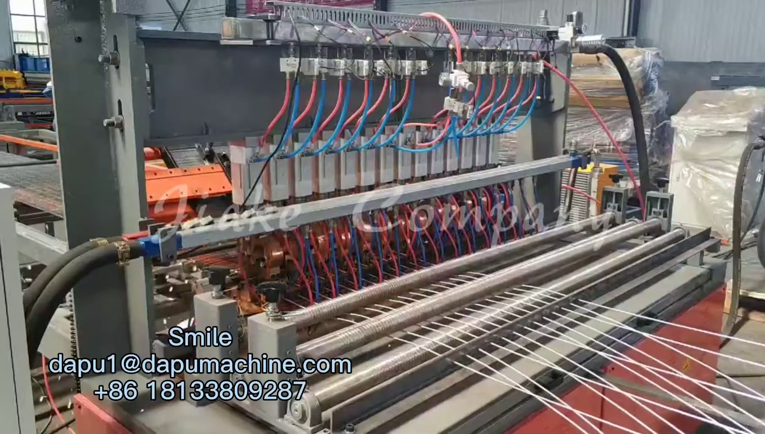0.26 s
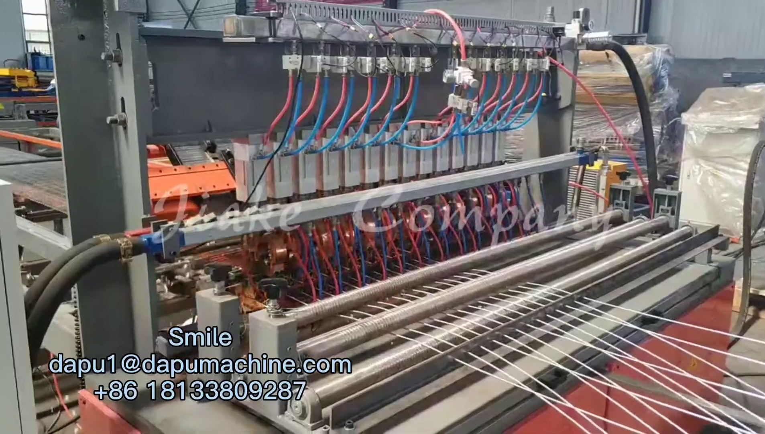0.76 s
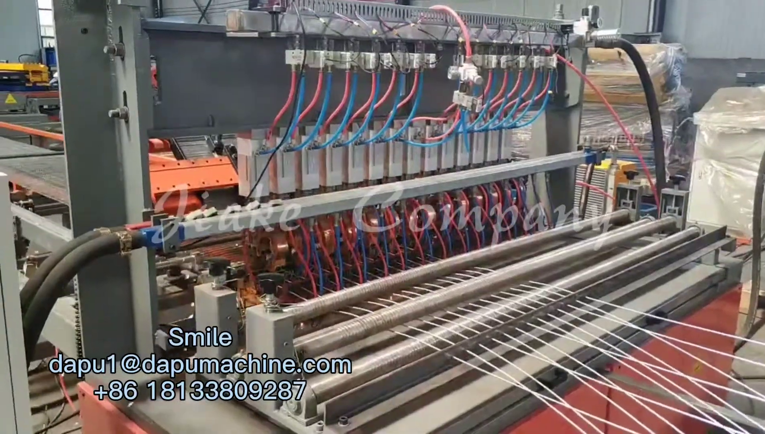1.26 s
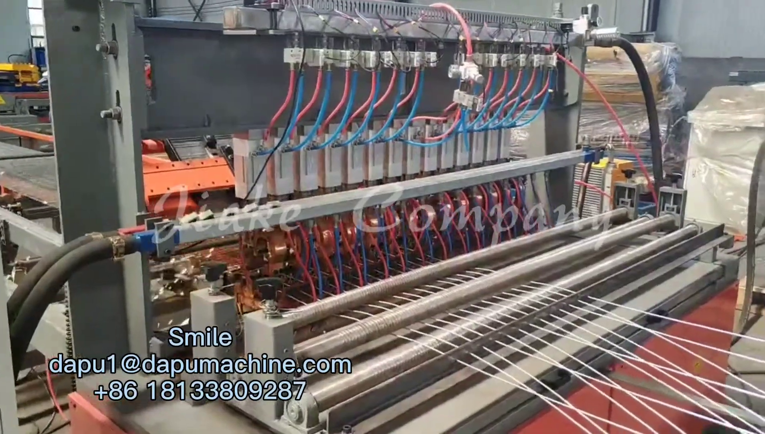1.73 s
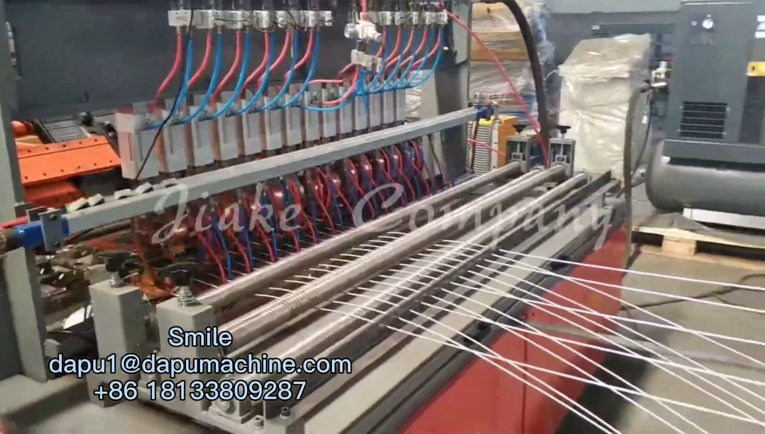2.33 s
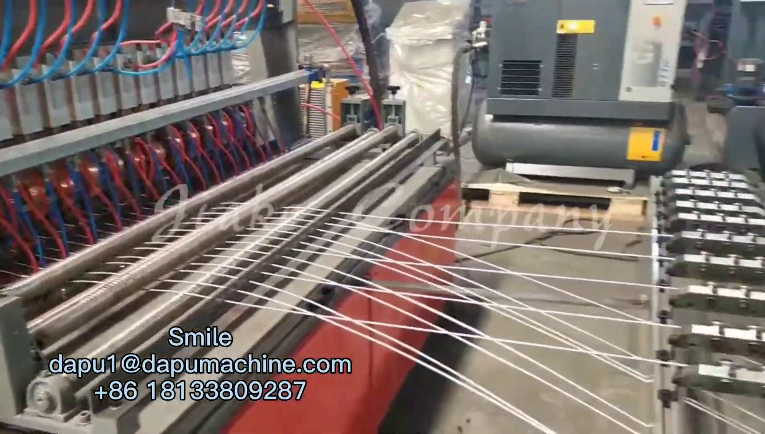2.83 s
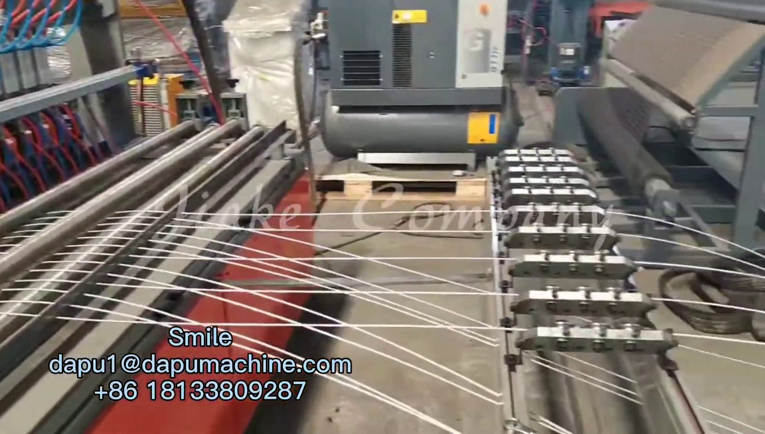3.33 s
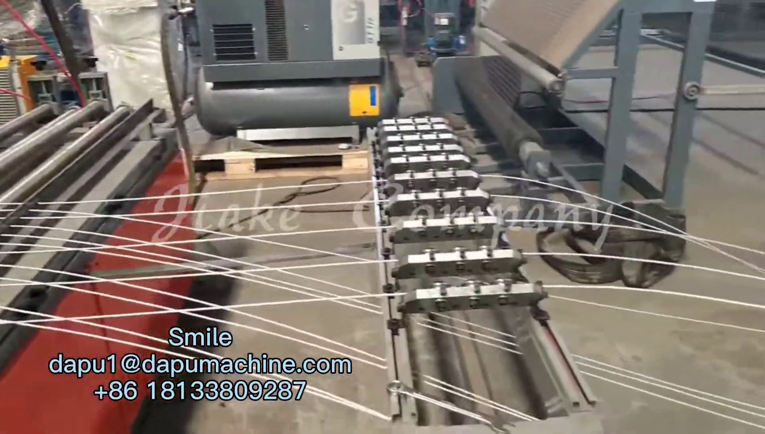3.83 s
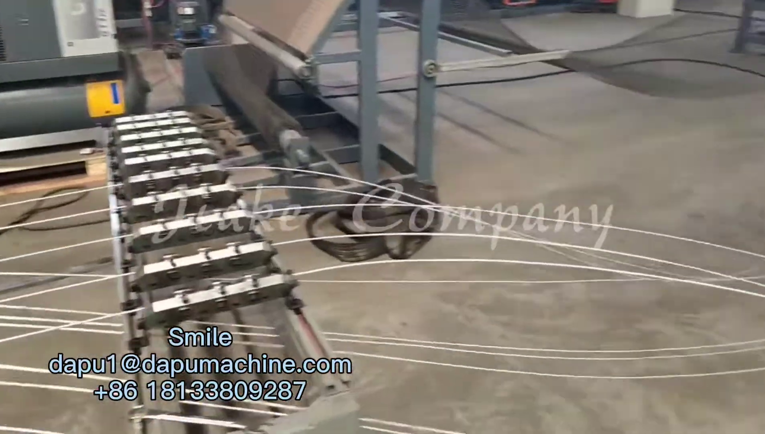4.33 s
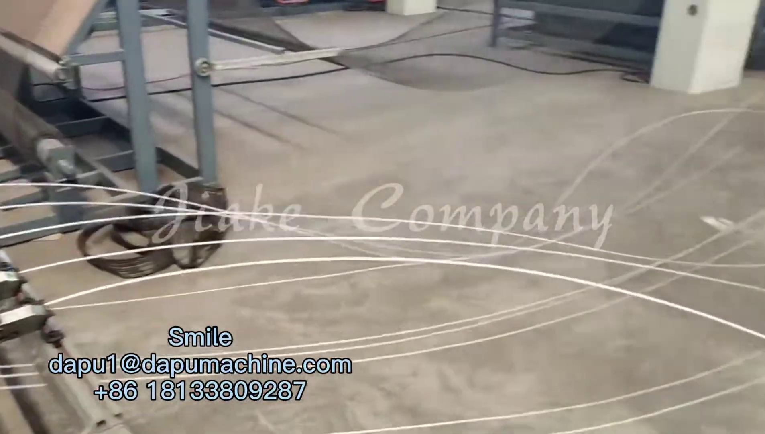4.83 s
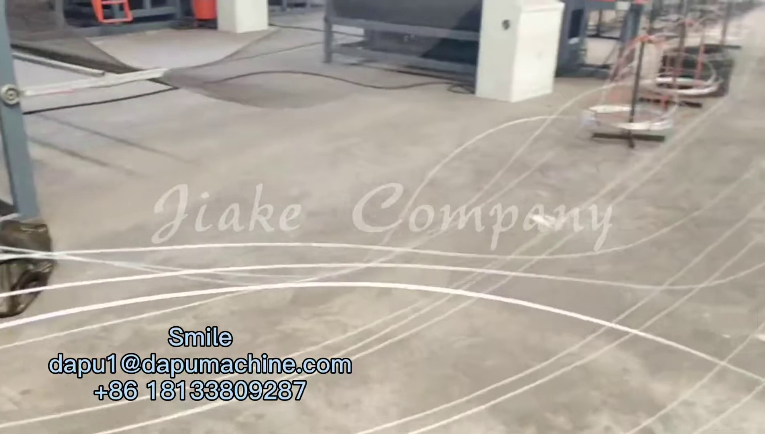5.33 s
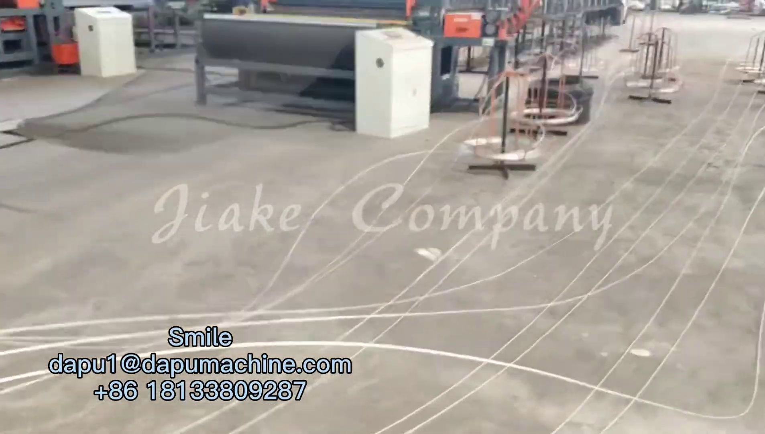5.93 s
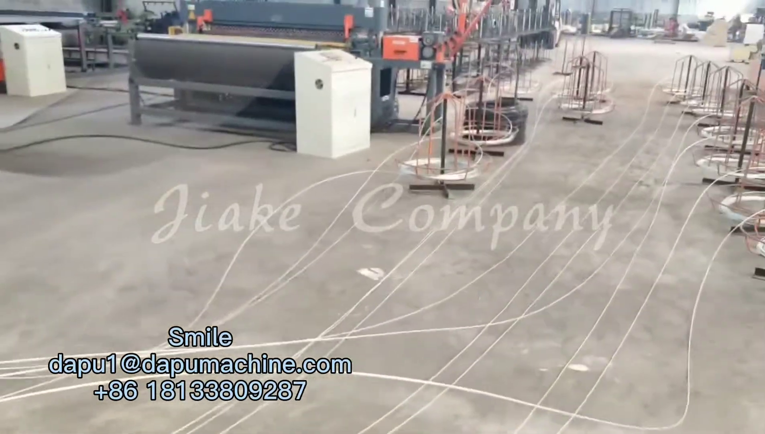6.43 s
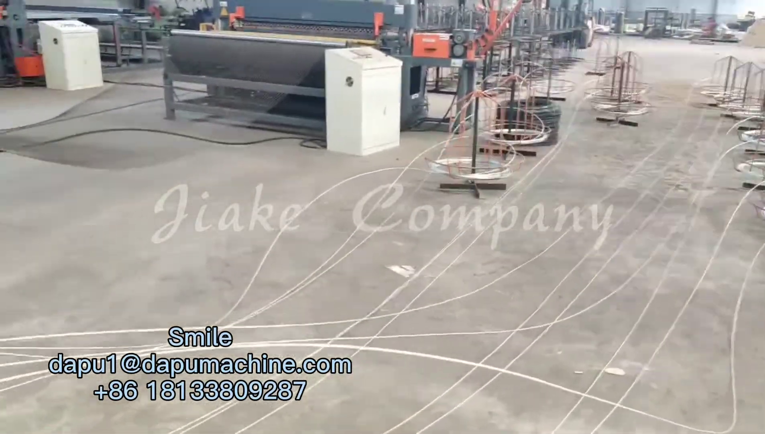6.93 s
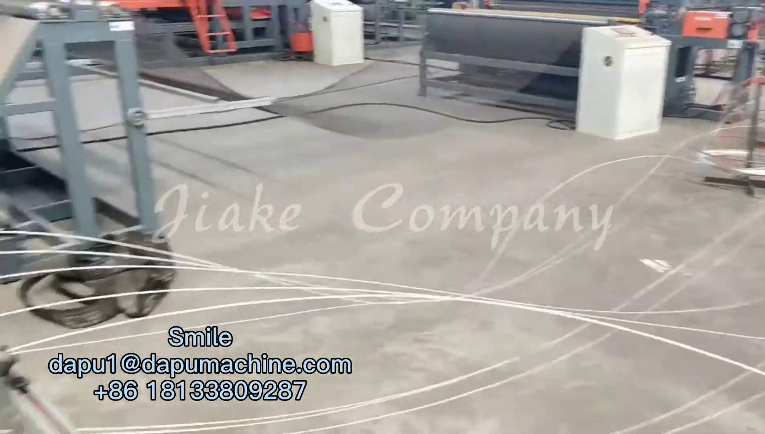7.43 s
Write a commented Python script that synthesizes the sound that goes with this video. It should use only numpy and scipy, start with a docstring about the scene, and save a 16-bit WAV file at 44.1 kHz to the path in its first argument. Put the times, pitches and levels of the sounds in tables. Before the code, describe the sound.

The sound opens quickly from a reduced level into dense factory din with faint wavering motor hum and constant fine wire chatter. From about 0.3 seconds a welding beam lands every half second. Before each blow wires scrape, feed air puffs twice and a bright valve ticks; then comes a low thump, metallic clack and ringing, quick bounces and frame rattle, a carriage jolt, and, about 0.27 seconds after landing, a soft lift thud and strong air hiss. Sharp weld spits crack near 0.9, 1.4, 2.9, 3.4, 4.4, 5.9, 6.4 and 6.9 seconds. Between 0.8 and 4.5 the hiss grows and rattle weakens. One stroke arrives slightly early around 5.5. From 4.5 to 7 the clatter becomes duller as the microphones turn away, then brightens toward the end near 7.6. Loud bursts briefly duck everything.

```python
"""A pneumatic wire-mesh welder runs at two strokes a second amid the filtered-noise din of a factory hall.
The gain opens at the start; each stroke then drags chattering wires (random contacts); a valve ticks brightly.
The electrode beam lands with a pressure swing, ringing damped modes; it bounces and some welds spit noise.
The carriage jolts back, the beam lifts, and the cylinders vent a hiss of noise shaped by falling pressure.
As the stereo microphones near the valves, hiss gains on rattle; the gain ducks after loud bursts."""
import sys
import numpy as np
from scipy import signal
from scipy.fft import rfft, irfft, next_fast_len
from scipy.io import wavfile
from scipy.ndimage import uniform_filter1d, map_coordinates

SR = 44100
rng = np.random.default_rng(int(sys.argv[2]) if len(sys.argv) > 2 else 0)


def inscribe(sig):
    """Save sig as 16-bit PCM at rate SR to the path in sys.argv[1].

    A 1-D sig is mono; a 2-D sig holds one channel per row.
    Samples are clipped to [-1, 1] before scaling.
    """
    pcm = np.round(np.clip(np.atleast_2d(sig).T, -1, 1) * 32767)
    wavfile.write(sys.argv[1], SR, pcm.astype(np.int16))


N = 338247

# damped modes of the machine frame, relative levels: frequency_hz, level_db, t60_s
FRAME_MODES = [(113.4, -4.5, 0.32), (159.2, -4, 0.22), (210.2, -4, 0.18), (258, -3.5, 0.1),
               (351.5, -6, 0.13), (419, -6.5, 0.086), (466, -1.5, 0.094), (560, -7, 0.1),
               (596, -1.5, 0.077), (734, -7, 0.059)]
# spectrum of escaping air, relative levels: frequency_hz, level_db
AIR_SPECTRUM = [(300, -26), (1500, -14), (2700, -6.5), (3700, -8.5), (5500, -3.5), (7000, 0), (8600, .5),
                (10000, -2), (11500, -8), (14200, -9)]
# stereo width, side minus mid: frequency_hz, side_minus_mid_db
STEREO_WIDTH = [(100, -23), (300, -12.5), (700, -5.5), (1400, -3.5), (4000, 0), (14000, -2)]

# the beam first lands at FIRST_S, then once every CYCLE_S
FIRST_S, CYCLE_S = 0.3136, 0.49811
# one weld is cut short, so each later step of the cycle comes early
SHORT_AT_S, SHORT_BY_S = 5.45, 0.021
# steps of the cycle: leads before the landing of the beam, the others after it
FEED_LEAD_S, TICK_LEAD_S, CLAMP_S, RETURN_S, LIFT_S = 0.117, 0.057, 0.0278, 0.13, 0.271
# standard deviation of a step's level from cycle to cycle
VARY_DB = 0.7


def amp(db):
    """A level in decibels as an amplitude ratio."""
    return 10 ** (np.asarray(db) / 20)


def unit(x):
    """Normalization to an rms value of 1."""
    return x / np.sqrt(np.mean(x ** 2) + 1e-20)


def along(points, hz):
    """Interpolation of (frequency, value) points on a logarithmic frequency axis."""
    f, v = np.transpose(points)
    return np.interp(np.log(hz + 1), np.log(f + 1), v)


def clock():
    """Time of every sample in seconds."""
    return np.arange(N) / SR


def wobble(rate):
    """Slow random modulation: a smooth curve through rate random knots a second."""
    return map_coordinates(rng.standard_normal(int(N * rate / SR) + 4), [clock() * rate])


def filtered(x, response):
    """Linear filtering: the spectrum times a complex response of frequency."""
    m = next_fast_len(N + SR // 2)
    return irfft(rfft(x, m) * response(np.fft.rfftfreq(m, 1 / SR)), m)[..., :N]


def spread(pair):
    """Interaural coherence: two unrelated signals become a pair alike in the bass, diffuse in the treble."""
    mid = pair[0]
    side = filtered(pair[1], lambda hz: amp(along(STEREO_WIDTH, hz)))
    return np.array([mid + side, mid - side])


def rush(spectrum, patchy_db):
    """Turbulence as shaped stereo noise of rms 1, with time-frequency patches of random gain."""
    z = signal.stft(rng.standard_normal((2, N), dtype=np.float32), nperseg=512)[2]
    field = uniform_filter1d(rng.standard_normal(z.shape[1:]), 4, 0)
    field = uniform_filter1d(field, 8, 1)
    patchy = z * amp(patchy_db * unit(field)).astype(np.float32)
    pair = signal.istft(patchy, nperseg=512)[1][:, :N]
    return unit(spread(filtered(pair, lambda hz: amp(along(spectrum, hz)))))


def ticks(rate, scatter_db):
    """Shot noise: two trains of random contacts, on average rate a second each, of rms 1."""
    contacts = rng.random((2, N)) < rate / SR
    signs = rng.choice([-1, 1], (2, N))
    return unit(contacts * signs * amp(scatter_db * rng.standard_normal((2, N))))


def played(times, gains, sound):
    """Superposition: the sound is added at each of the times."""
    out = np.zeros(N + 2 * SR)
    for s, gain in zip(times, gains):
        out[max(round(s * SR), 0):][:len(sound)] += gain * sound
    return out[:N]


def bursts(times, levels_db, rise, hold, t60):
    """Exponential decay: an envelope that swells, holds and dies away from each of the times."""
    t = np.arange(SR // 2) / SR
    shape = np.minimum(t / rise, 1) * amp(-60 * np.maximum(t - rise - hold, 0) / t60)
    return played(times, amp(levels_db), shape)


def ring(force, modes):
    """Modal resonance: a force drives damped modes; a mode's level is its share of the energy."""
    t = np.arange(SR // 2) / SR
    answer = np.zeros(len(t))
    for hz, db, t60 in modes:
        decay = amp(db - 60 * t / t60) / np.sqrt(t60)
        answer += decay * np.sin(2 * np.pi * hz * t + rng.uniform(0, 2 * np.pi))
    answer /= np.linalg.norm(answer)
    return spread(signal.fftconvolve(force, answer[None], axes=1)[:, :N])


def push(hz, life):
    """Heavily damped impact: about one swing of pressure, with a peak of 1."""
    t = np.arange(SR // 10) / SR
    swing = np.sin(2 * np.pi * hz * t) * t / life * np.exp(-t / life)
    return swing / np.abs(swing).max()


def cycle(offset):
    """Periodic motion: times at which a step comes round, offset seconds from each landing."""
    s = np.arange(FIRST_S - CYCLE_S, N / SR, CYCLE_S) + offset
    s = s - SHORT_BY_S * (s > SHORT_AT_S)
    return s[s > 0]


def varied(db, times):
    """Random variation of level: no two cycles are quite alike."""
    return db + VARY_DB * rng.standard_normal(len(times))


def walked(times):
    """Change of distance: share of the way gone from the beam towards the exhaust valves."""
    # the walk: time_s, share_of_way (0-1)
    walk = [(0.8, 0.01), (4.5, 0.93)]
    return np.interp(times, *np.transpose(walk))


def facing():
    """Directivity: a gain for how squarely the microphones face the machine."""
    # turning away and back: time_s, gain_db
    turns = [(0, 2), (2.5, 2), (3.5, 0), (4.5, -0.5), (5.9, -3.5), (7, -4.5), (7.6, 2)]
    return amp(np.interp(clock(), *np.transpose(turns)))


def hall():
    """Incoherent sum of other machines: wavering broadband din with motor tones of random level and phase."""
    # din spectrum, relative levels: frequency_hz, level_db
    din_spectrum = [(15, -39), (25, -5.5), (114, -3.5), (234, 1), (305, -3), (388, -2), (520, -5.5),
                    (700, -6.5), (1680, -8), (2640, -5.5), (3700, -11), (5800, -7), (7500, -6),
                    (10000, -14), (12500, -19.5), (14500, -29)]
    # motor hum, mean levels: frequency_hz, level_db
    hum_tones = [(125, -41), (216, -39), (414, -37), (980, -42)]
    hum = np.zeros(N)
    for hz, db in hum_tones:
        level = amp(db + 2.1 * wobble(4.56)) * np.sqrt(2)
        hum += level * np.sin(2 * np.pi * hz * clock() + 1.44 * wobble(11))
    din = amp(-13.5 + 1.5 * wobble(12)) * rush(din_spectrum, patchy_db=1.5)
    return din + hum


def wire_feed():
    """Friction and repeated contact: wires always chatter; valve puffs, a drag and a carriage jolt recur."""
    # contact noise, relative levels: frequency_hz, level_db
    chatter_spectrum = [(500, -18), (1500, -16), (2600, 7), (4500, 9.5), (7500, -28), (10000, 8),
                        (14000, -52)]
    # sliding noise, relative levels: frequency_hz, level_db
    drag_spectrum = [(300, -12.5), (1000, -6), (1600, -1.5), (2600, -0.5), (3500, -5), (5000, -7.5),
                     (8000, -4.5), (14000, -20.5)]
    # feed-valve air, relative levels: frequency_hz, level_db
    valve_spectrum = [(1500, -44), (5000, -20), (8500, 11), (11000, 10), (14200, -12)]
    # wires and their guides, relative levels: frequency_hz, level_db, t60_s
    wire_modes = [(2182, 5.5, 0.041), (2364, -2, 0.064), (2695, -1, 0.12), (2933, 3, 0.077), (3163, 3, .06),
                  (3700, 3, 0.027), (4220, 1.5, 0.28), (5840, -1, 0.18), (7000, -18, .08),
                  (7450, -22, 0.072), (8320, 6.5, 0.087)]
    s = cycle(-FEED_LEAD_S)
    drag = bursts(s, varied(0, s), rise=0.034, hold=0.12, t60=1.0)
    contacts = ticks(rate=300, scatter_db=0.5) * (1 + 0.5 * drag)  # stronger while dragged
    chatter = unit(spread(filtered(contacts, lambda hz: amp(along(chatter_spectrum, hz)))))
    scrape = drag * rush(drag_spectrum, patchy_db=0.5)
    puffs = np.zeros(N)
    for delay_s in (0, 0.025):  # the valve puffs twice
        puffs += bursts(s + delay_s, varied(0, s), rise=0.012, hold=0.004, t60=0.12)
    valve = puffs * rush(valve_spectrum, patchy_db=2.5)
    back = cycle(RETURN_S)
    jolt = bursts(back, varied(-19.5, back), rise=0.0015, hold=0.008, t60=0.05)
    carriage = ring(ticks(rate=1500, scatter_db=-0.5) * jolt, FRAME_MODES)
    ringing = ring(contacts, wire_modes)
    return (amp(-24.0) * chatter + amp(-14.5) * scrape + amp(-20.5) * valve
            + amp(-28.5) * ringing + carriage)


def valve_ticks():
    """Transient noise: a short bright valve tick before each landing, random in time and level."""
    # tick spectrum, relative levels: frequency_hz, level_db
    tick_spectrum = [(1000, -27), (3500, -15), (7500, 2), (11000, 11), (14200, -5)]
    s = cycle(-TICK_LEAD_S)
    late, louder = rng.standard_normal((len(s), 2)).T
    # standard deviations: 12.4 ms and 4 dB
    envelope = bursts(s + 0.0124 * late, -14 + 4 * louder, rise=0.0005, hold=0.002, t60=0.02)
    return envelope * rush(tick_spectrum, patchy_db=0.8)


def exhaust():
    """Jet noise: valves leak, open and blow off as cylinder pressure falls; the lifting beam thuds softly."""
    s = cycle(LIFT_S)
    db = varied(0.2 + 6.0 * walked(s), s)  # the hiss grows along the walk
    opening = bursts(s - 0.001, np.zeros(len(s)), rise=0.0048, hold=0.061, t60=0.081)
    pressure = bursts(s - 0.003, db - 9.0, rise=0.002, hold=0.017, t60=0.78)
    leak = bursts(s - 0.025, db - 19.0, rise=0.036, hold=0.013, t60=0.45)
    thud = played(s - 0.006, amp(varied(-17.5, s)), push(hz=69.6, life=0.0039))
    return (opening * pressure + leak) * rush(AIR_SPECTRUM, patchy_db=1.5) + thud


def welds():
    """Explosive expulsion of molten metal: a sharp noise crack with a weaker echo dying away in the hall."""
    # spitting welds, relative levels: start_s, level_db
    spits = [(0.921, 11), (1.4218, 8), (2.922, 12), (3.4104, 10), (4.4102, 13.5), (5.8886, 11), (6.3856, 9),
             (6.8852, 6)]
    # spark noise, relative levels: frequency_hz, level_db
    spark_spectrum = [(200, -31), (1200, -15), (3200, 9), (5500, 5.5), (8000, 14), (10500, 7), (14000, -11)]
    s, db = np.transpose(spits)
    crack = bursts(s, db - 10.3, rise=0.0005, hold=0.0045, t60=0.04)
    echo = bursts(s, db - 25.5, rise=0.014, hold=0.0083, t60=1.0)
    return (crack + echo) * rush(spark_spectrum, patchy_db=2.5)


def beam():
    """Impact excitation: the beam thumps and bounces, its holders ring, and clamping rattles the frame."""
    # electrode holders, relative levels: frequency_hz, level_db, t60_s
    holder_modes = [(3090, -8, 0.13), (3304, 2, 0.24), (3420, -10, 0.18), (3430, -12, 0.17),
                    (3680, -1, 0.13), (4960, -6.5, 0.095), (7250, -2, 0.16)]
    # hollow box section of the beam, relative levels: frequency_hz, level_db, t60_s
    box_modes = [(753, -5, 0.046), (811, -2.5, 0.059), (877, -0.5, 0.056), (960, 0.5, 0.05),
                 (1087, -11, 0.052), (1307, -3.5, 0.067)]
    # noise of the blows, relative levels: frequency_hz, level_db
    clack_spectrum = [(150, 5.5), (450, -9), (900, -1), (1500, -2.5), (3200, -1.5), (6000, -3),
                      (14000, -18)]
    s = cycle(0)
    clamped = s + CLAMP_S
    # reference levels; the rattle fades along the walk
    thump_db = varied(-5.5, s)
    rattle_db = varied(0.9 - 4 * walked(s), s)

    thump = played(s, amp(thump_db - 1.3), push(hz=159, life=0.0022))
    knock = bursts(s - 0.001, thump_db - 3.5, rise=0.0018, hold=0.0015, t60=0.03)
    puff = bursts(s - 0.002, thump_db - 3.0, rise=0.0059, hold=0.013, t60=0.44)
    puff = puff * rush(AIR_SPECTRUM, patchy_db=2)
    blow = bursts(s + 0.0103, thump_db - 5, rise=0.0013, hold=0.0034, t60=0.041)
    holders = ring(ticks(rate=3000, scatter_db=4.5) * blow, holder_modes)

    clamp = bursts(clamped, rattle_db - 7, rise=0.0025, hold=0.025, t60=0.22)
    shaking = bursts(clamped, rattle_db - 15.5, rise=0.0015, hold=0.017, t60=0.39)
    jolts = ticks(rate=900, scatter_db=4.0) * shaking
    rattle = ring(jolts, FRAME_MODES)
    clunk = bursts(clamped + 0.0052, rattle_db - 14.5, rise=0.0012, hold=0.0058, t60=0.02)
    clunk = clunk * ticks(rate=3000, scatter_db=3.5)

    # three bounces on the wires, 8.95 ms apart, each 4 dB weaker than the last
    bounce = push(hz=168, life=0.0023)
    rebound = np.zeros(N)
    for k in range(3):
        rebound += played(s + 0.045 + k * 0.00895, amp(rattle_db - 9.5 - k * 4), bounce)

    # these radiate straight ahead
    direct = facing() * (holders + amp(-1.6) * ring(jolts + clunk, box_modes))
    clack = (knock + clamp) * rush(clack_spectrum, patchy_db=1.5)
    return thump + puff + direct + clack + rattle + rebound


def rippled(x, ripple_db):
    """Random modulation: slow ripples of gain across time and frequency, mainly in the treble."""
    hz, _, z = signal.stft(x, SR, nperseg=2048)
    field = uniform_filter1d(rng.standard_normal(z.shape), 3, 1)
    field = uniform_filter1d(field, 30, 2)
    depth_db = ripple_db * hz / np.hypot(hz, 600)
    return signal.istft(z * amp(depth_db[:, None] * unit(field)), SR, nperseg=2048)[1][:, :N]


def scene():
    """Interaural delay and level: the machine is to one side, its treble later at the left microphone."""
    # frequencies shaded on turning away: frequency_hz, share (0-1)
    shaded_band = [(1200, 0.18), (2500, 0.67), (4500, 0.9), (7000, 0.03)]
    # stereo balance, left minus right: frequency_hz, left_minus_right_db
    lean = [(60, -4.5), (110, -1), (200, -2.5), (370, 0), (690, -1), (1270, 2), (2330, 3.0), (4280, 5),
            (7880, 1), (14500, -1)]
    mix = rippled(hall() + wire_feed() + exhaust(), ripple_db=2) + beam() + welds() + valve_ticks()
    shaded = filtered(mix, lambda hz: np.clip(along(shaded_band, hz), 0, 1))
    mix = mix + (facing() - 1) * shaded

    def half(hz):
        """Half the level difference and half the delay between the channels."""
        lag_s = 0.00045 * hz ** 2 / (hz ** 2 + 1300 ** 2)
        return amp(along(lean, hz) / 2) * np.exp(-1j * np.pi * hz * lag_s)

    return filtered(mix, lambda hz: np.array([half(hz), 1 / half(hz)]))


def smooth(v, span):
    """First-order lag with a time constant of span seconds."""
    keep = np.exp(-1 / (span * SR))
    return signal.lfilter([1 - keep], [1, -keep], v)


def gain_control(x, limit_db, attack, release_db):
    """Compression: gain falls fast above the limit and climbs back at release_db a second."""
    sensed = filtered(x, lambda hz: hz / np.hypot(hz, 350))  # deep thumps pass almost unnoticed
    level_db = 10 * np.log10(smooth(np.mean(sensed ** 2, axis=0), 0.0034) + 1e-12)
    climb = release_db * clock()
    cut_db = np.maximum.accumulate(np.maximum(level_db - limit_db, 0) + climb) - climb
    # the gain opens gradually at switch-on
    settling_db = 18 * np.exp(-clock() / 0.08)
    return x * amp(-smooth(cut_db, attack) - settling_db)


def record(dry):
    """Saturation and band limiting: the level is controlled, tall peaks are rounded, the top is cut off."""
    levelled = amp(1.5) * gain_control(dry, limit_db=-17.0, attack=0.0013, release_db=118.5)
    rounded = levelled / (1 + np.abs(levelled / 0.85) ** 6) ** (1 / 6)
    return filtered(rounded, lambda hz: hz < 14450)


dry = scene()
out = record(dry)
inscribe(out)
```